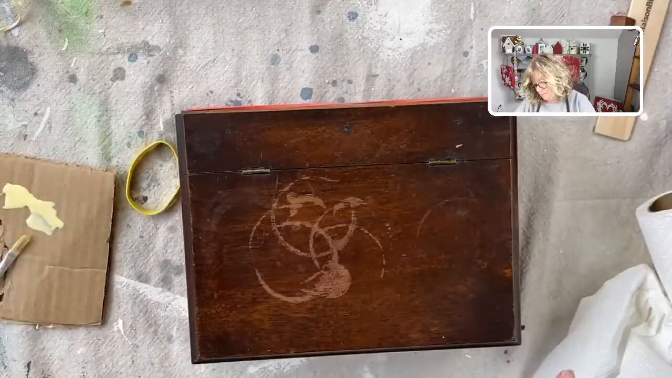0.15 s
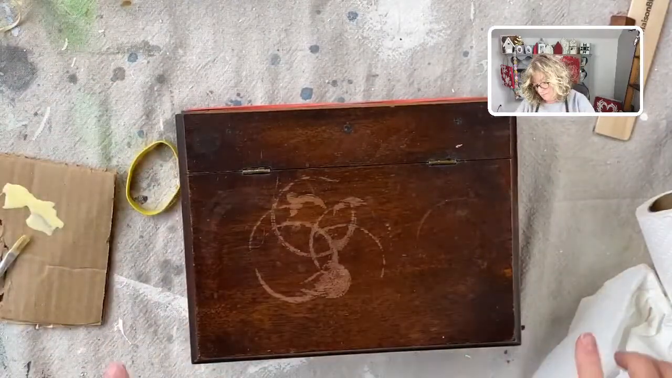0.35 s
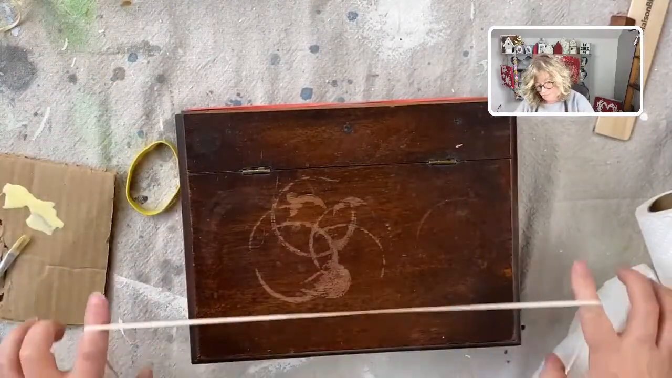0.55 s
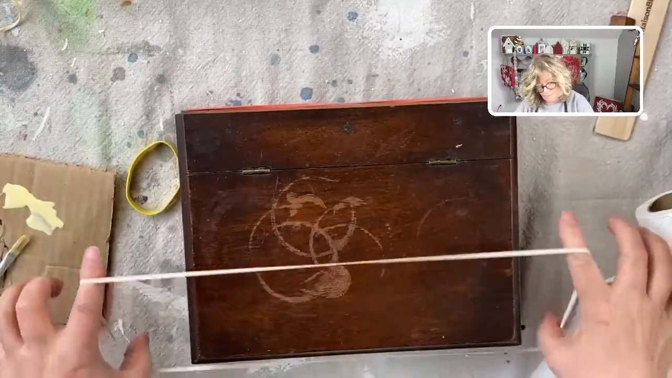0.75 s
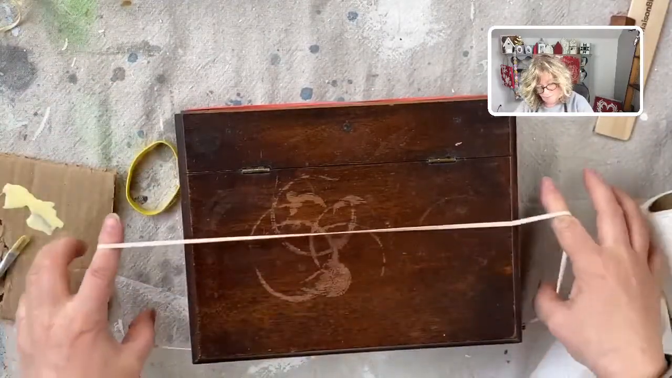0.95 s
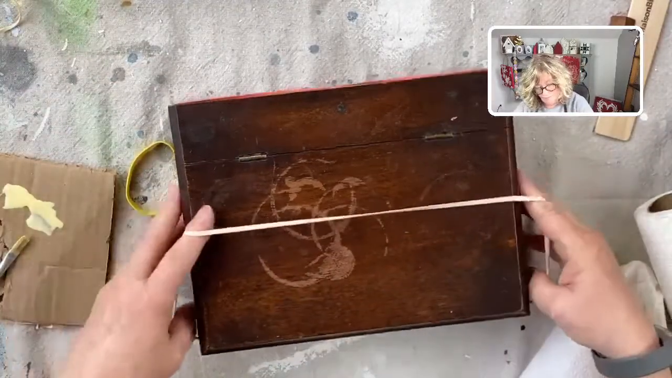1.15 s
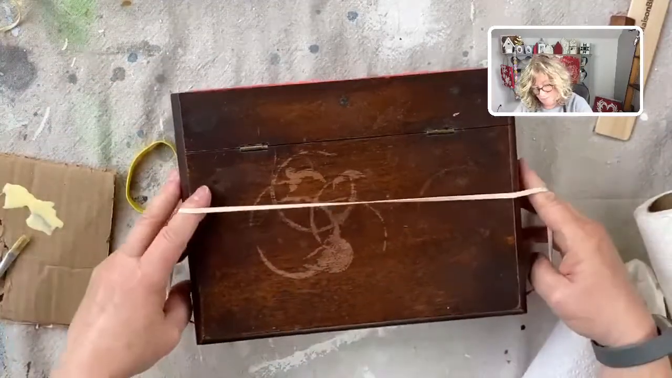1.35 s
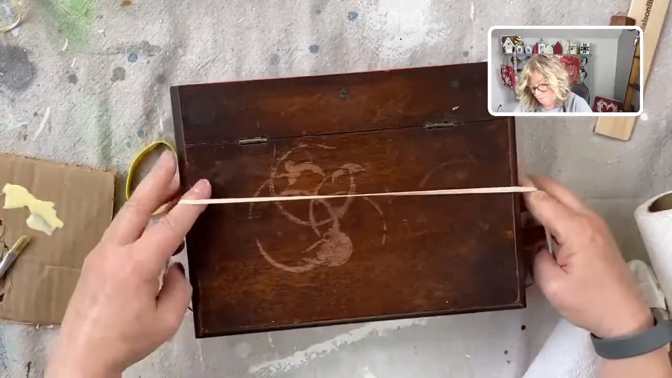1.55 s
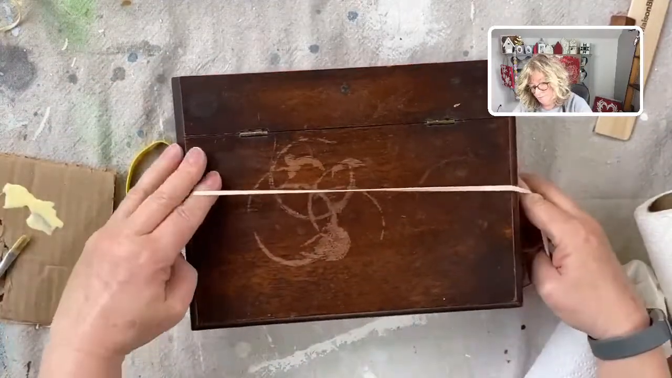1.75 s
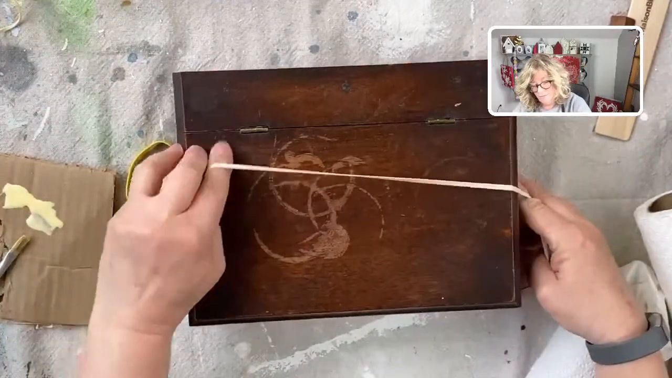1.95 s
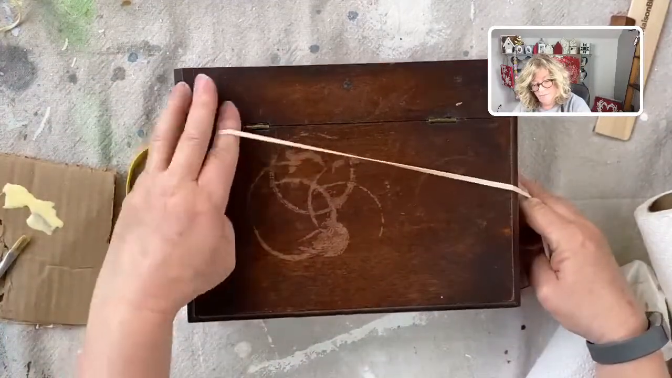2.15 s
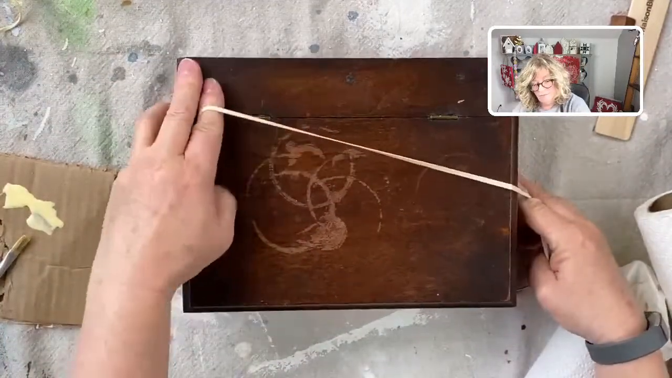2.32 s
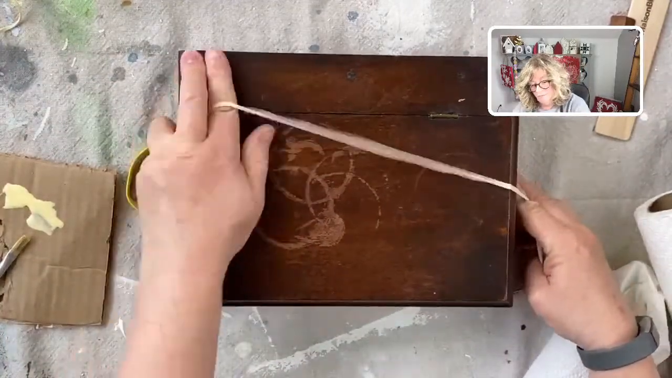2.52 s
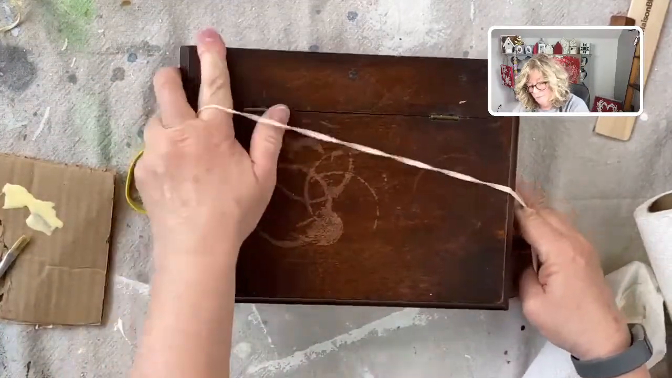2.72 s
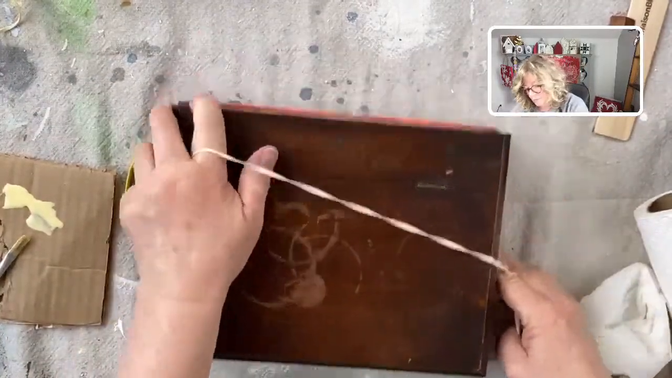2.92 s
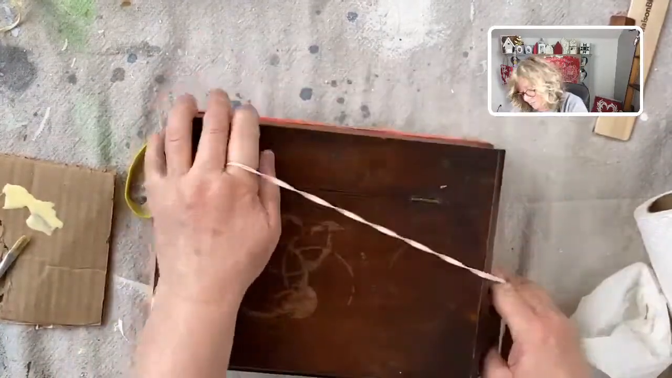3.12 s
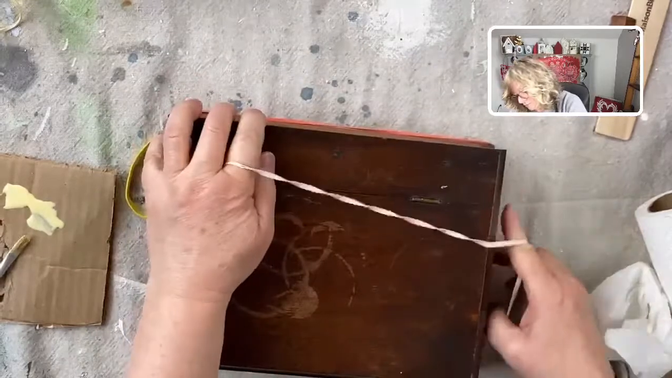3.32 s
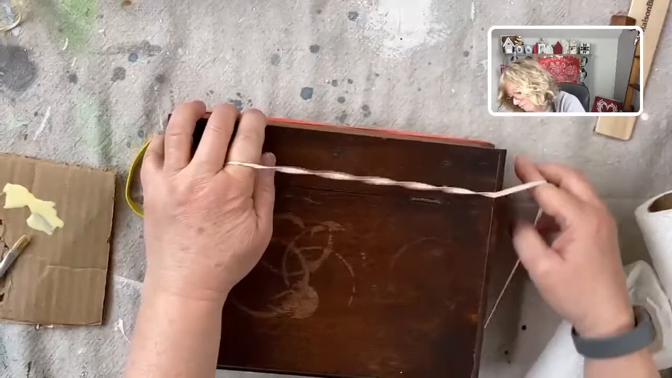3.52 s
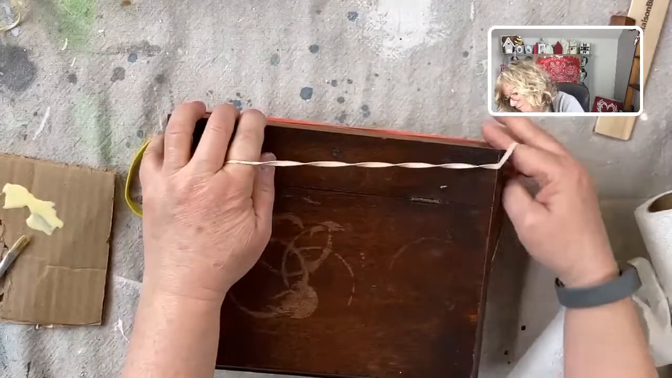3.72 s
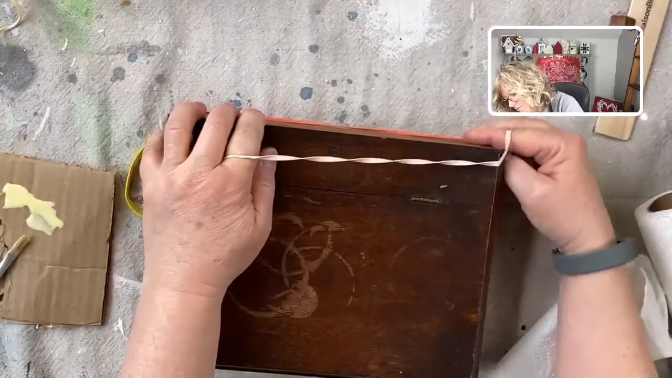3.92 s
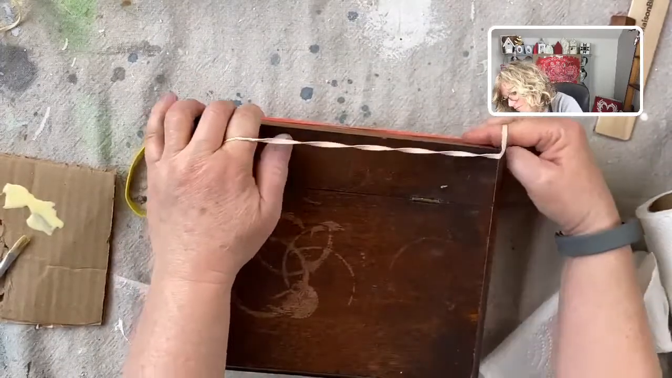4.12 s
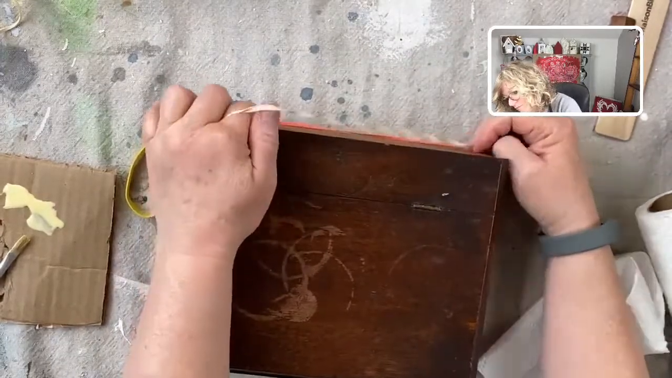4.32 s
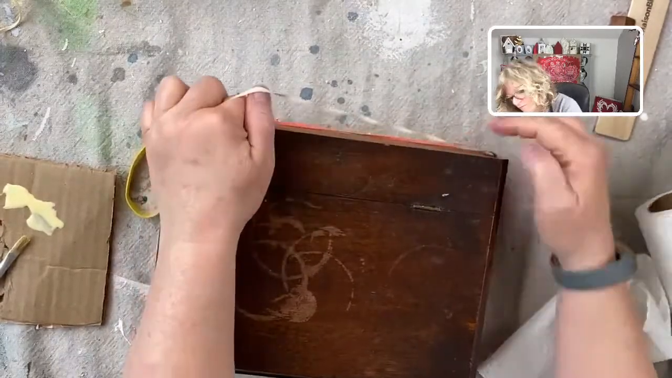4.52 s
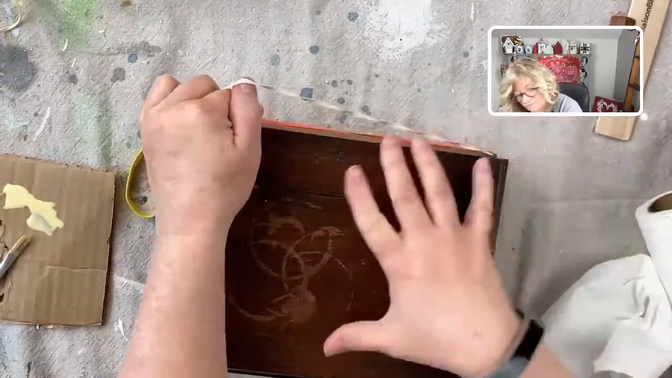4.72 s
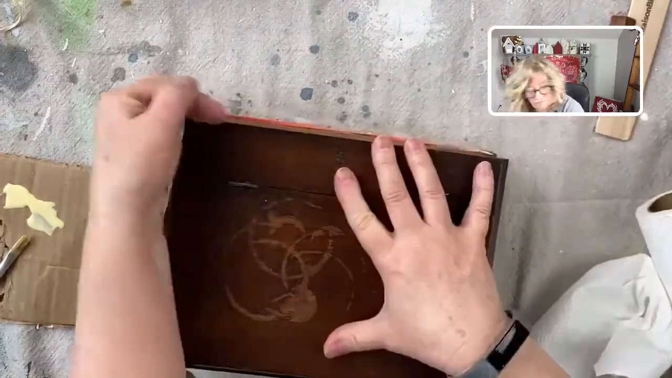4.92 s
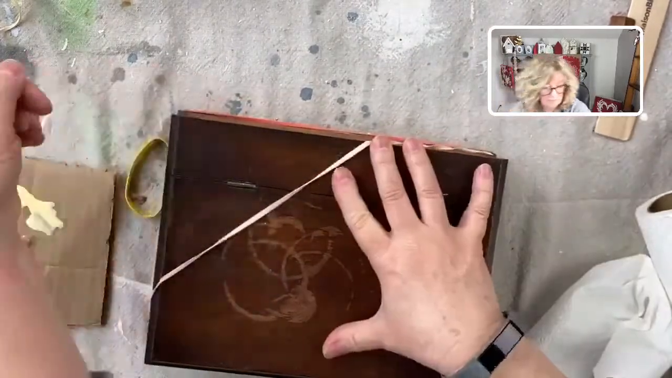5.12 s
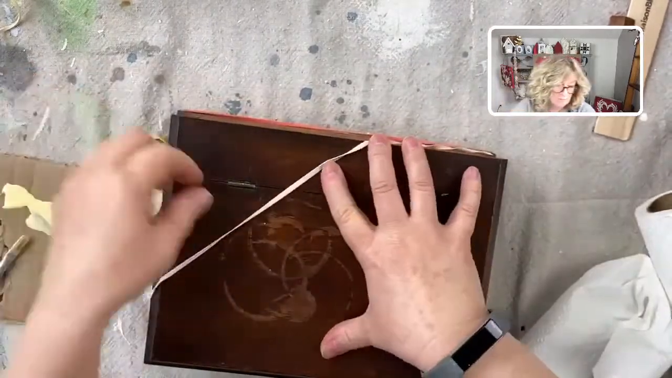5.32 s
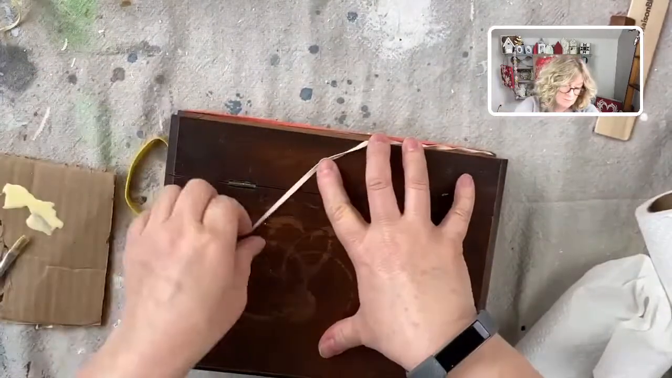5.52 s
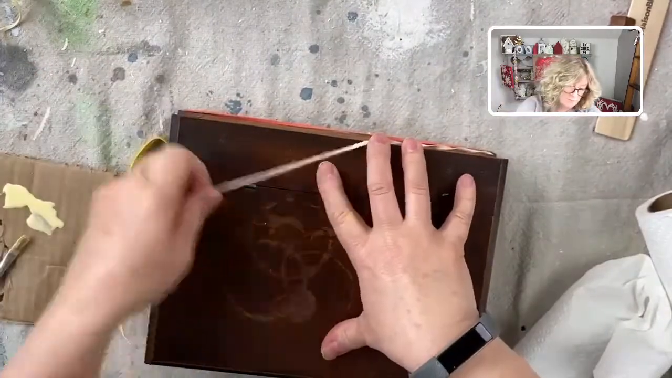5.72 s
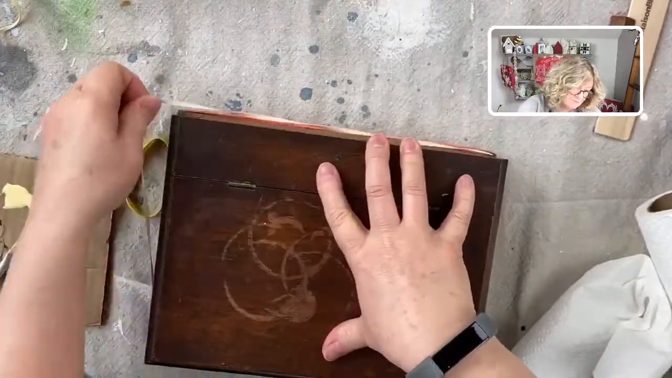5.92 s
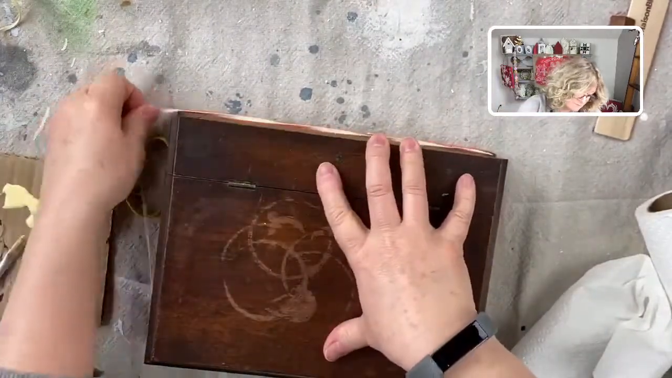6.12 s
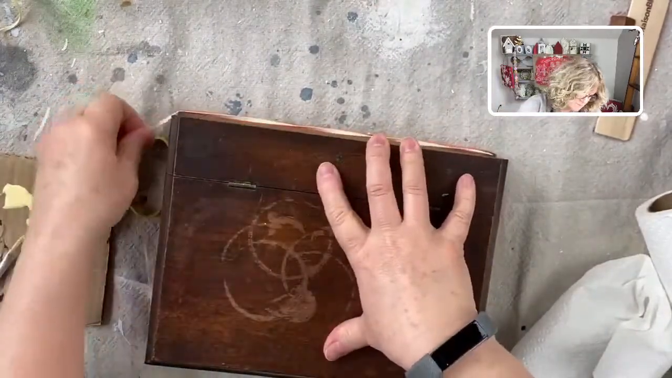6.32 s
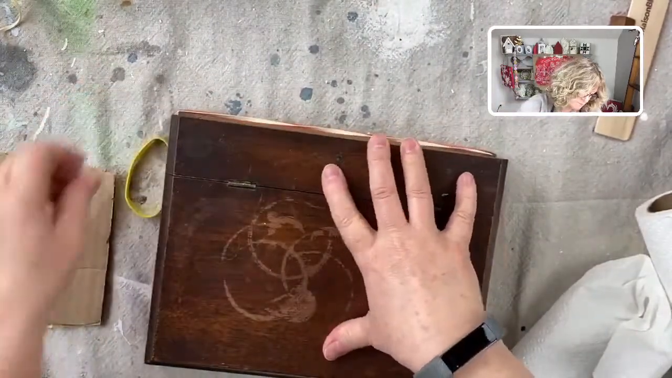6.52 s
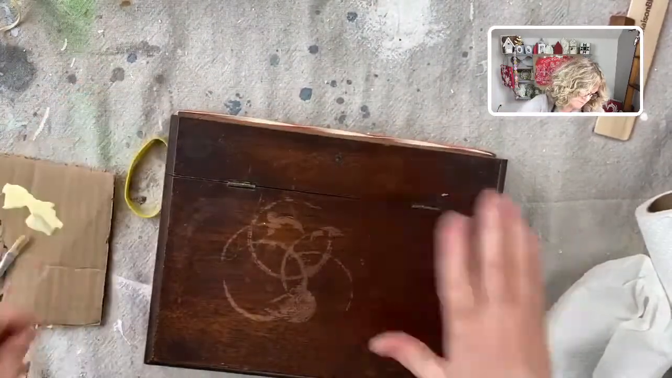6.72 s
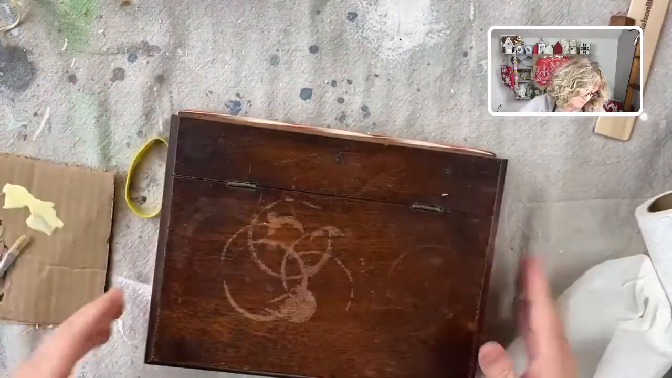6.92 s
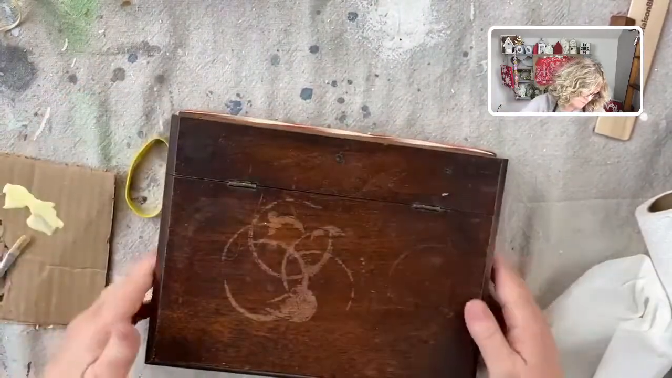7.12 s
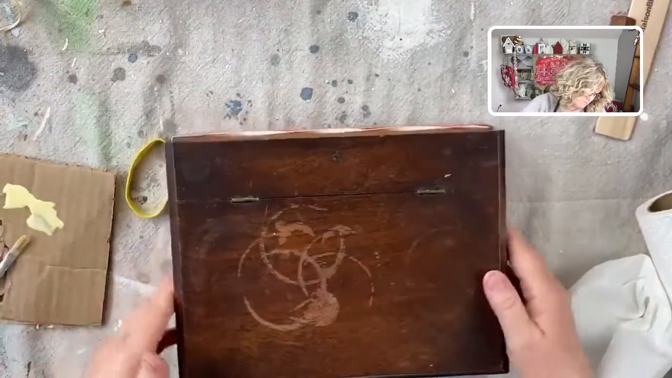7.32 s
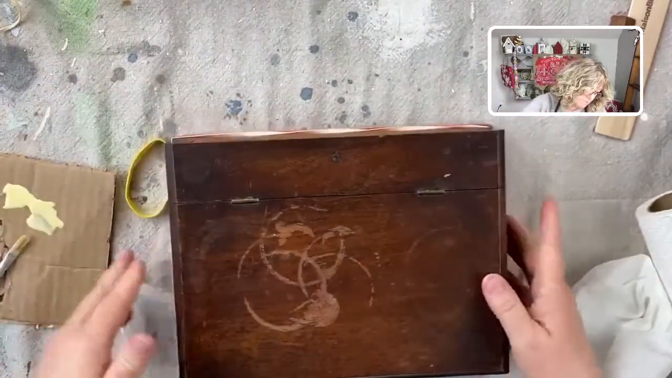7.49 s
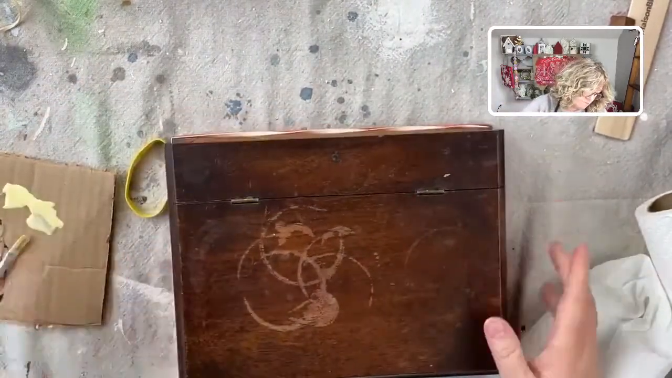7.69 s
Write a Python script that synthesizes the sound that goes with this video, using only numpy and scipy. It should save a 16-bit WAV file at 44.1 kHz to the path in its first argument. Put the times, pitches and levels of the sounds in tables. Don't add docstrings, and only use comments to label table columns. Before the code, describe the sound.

Close to the microphone in a small quiet room, a rubber band flicks with an early snap, then is worked around a hollow wooden box. The box scrapes and thumps softly on a cloth-covered table amid light rubber ticks and finger rubs. A fluttering snap follows past four seconds, a very loud crack at five, and another sharp snap near six and a half before quiet settling.

```python
import sys
import numpy as np
from scipy import signal
from scipy.fft import rfft, irfft, next_fast_len
from scipy.io import wavfile
from scipy.ndimage import uniform_filter1d, map_coordinates

SR = 44100
rng = np.random.default_rng(int(sys.argv[2]) if len(sys.argv) > 2 else 0)


def ratio(d):
    e = np.asarray(d, float) / 20
    return 10 ** e


def dump(signal):
    limited = np.clip(np.atleast_2d(signal).T, -1, 1)
    pcm = np.round(limited * 32767).astype(np.int16)
    wavfile.write(sys.argv[1], SR, pcm)


N = 341775

# frequency in Hz, level in dB.
LID_MODES = [(431, -6), (646, 1), (710, -2), (810, 0.5), (1075, -1), (1270, 0), (1450, -3), (1710, 1.5),
             (1950, -1.5), (2350, -1), (2520, -3.5), (2900, 1), (3320, -3), (3920, -3.5)]


def unit(x):
    return x / np.sqrt(np.mean(x ** 2) + 1e-20)


def along(points, hz):
    f, v = np.transpose(points)
    return np.interp(np.log(hz + 1), np.log(f + 1), v)


def curves(rows):
    s, *cols = np.transpose(rows)
    return [np.interp(np.arange(N) / SR, s, c) for c in cols]


def wobble(rate_hz):
    knots = rng.standard_normal(int(N * rate_hz / SR) + 4)
    return map_coordinates(knots, [np.arange(N) * rate_hz / SR])


def filtered(x, response):
    m = next_fast_len(N + SR // 2)
    return irfft(rfft(x, m) * response(np.fft.rfftfreq(m, 1 / SR)), m)[..., :N]


def highpass(f, corner_hz):
    return 1j * f / (corner_hz + 1j * f)


def resonance(f, centre_hz, width_hz, db):
    return ratio(db) * 1j * f * width_hz / (centre_hz ** 2 - f * f + 1j * f * width_hz)


def onset(t, rise_s):
    return 1 - np.exp(-t / rise_s)


def ring(t, hz, t60_s, rise_s):
    return np.sin(2 * np.pi * hz * t) * ratio(-60 * t / t60_s) * onset(t, rise_s)


def noise(spectrum, grit_db=0, patchy_db=0):
    grains = rng.standard_normal(N) * ratio(grit_db * rng.exponential(size=N))
    z = signal.stft(grains, nperseg=512)[2]
    field = uniform_filter1d(rng.standard_normal(z.shape), size=4, axis=0)
    field = uniform_filter1d(field, size=7, axis=1)
    patchy = signal.istft(z * ratio(patchy_db * unit(field)), nperseg=512)[1][:N]
    return unit(filtered(patchy, lambda hz: ratio(along(spectrum, hz))))


def causal(spectrum):
    size = 1024
    cep = irfft(np.log(ratio(along(spectrum, np.fft.rfftfreq(size, 1 / SR))) + 1e-4), size)
    cep[1:size // 2] *= 2
    cep[size // 2 + 1:] = 0
    pulse = irfft(np.exp(rfft(cep)), size)[:size // 2]
    return pulse / np.linalg.norm(pulse)


def band(contacts, rise_s, crack_db, slap_db, far_db):
    # frequency in Hz, level in dB per Hz.
    rubber_colour = [(880, -41.5), (1500, -15.5), (3410, -4.5), (4050, -7.5), (5530, -4.5), (7770, -7.5),
                     (9890, -3.5), (12300, -3), (13600, 0.5), (16000, -5.5), (16500, -31.5)]
    lid_reach = 0.45
    t = np.arange(SR // 8) / SR
    n = len(t)
    rubber, wood = np.zeros((2, N + SR)), np.zeros((2, N + SR))
    lid_hz, lid_db = np.transpose(LID_MODES)
    sines = np.sin(2 * np.pi * lid_hz[:, None] * t)
    for s, db, wood_db, hz, flutter_s, wood_s in contacts:
        at = round(s * SR)
        chance, modes = rng.standard_normal((3, n)), rng.standard_normal((2, len(lid_hz)))
        uneven = unit(uniform_filter1d(chance[2], size=40))
        shake = ratio(1.5 * uneven - 60 * t / flutter_s) * onset(t, rise_s)
        rubber[0, at:at + n] += ratio(db - 9) * shake * chance[0]
        rubber[0, at + 12] += ratio(db + crack_db)
        rubber[1, at] += ratio(db - 6.5) * np.linalg.norm(shake)

        nearness = np.exp(-(np.log(lid_hz / hz) / lid_reach) ** 2)
        woken = ratio(lid_db + 2 * modes[0]) * np.sign(modes[1]) * nearness
        lid = ring(t, hz, wood_s, rise_s)
        lid += ratio(-9) * woken @ sines * ratio(-60 * t / (1.6 * wood_s)) * onset(t, rise_s)
        bandpass = signal.butter(2, [hz / 2, hz * 2.13], "band", fs=SR)
        slap = ratio(slap_db) * shake * unit(signal.lfilter(*bandpass, chance[1]))
        wood[0, at:at + n] += ratio(db + wood_db) * (lid + slap)
        smooth = unit(ring(t, hz, 0.0019, 0.00012)) / np.sqrt(n)
        wood[1, at:at + n] += ratio(db + wood_db + far_db) * np.linalg.norm(lid + slap) * smooth
    bright = signal.fftconvolve(rubber, causal(rubber_colour)[None], axes=1)[:, :N]
    return bright + filtered(wood[:, :N], lambda f: highpass(f, 350) ** 2)


def snaps_taps_and_scuffs():
    # start in seconds, bright peak in dB, wood above it in dB, wood pitch in Hz.
    snap_rows = [(0.2628, -24.5, -1.5, 2730), (0.2644, -36.5, -14, 2440), (0.2708, -21.5, -9, 1980),
                 (0.2743, -19.5, -9.5, 610), (0.2914, -29, -6, 775), (4.364, -29, -1, 1450),
                 (4.3689, -32, -3, 1300), (4.372, -24.5, -10, 1400), (4.375, -22.5, -11, 1410),
                 (4.3795, -27, -10, 1700), (4.3835, -29, -9, 1500), (4.3868, -26, -11, 1400),
                 (4.3893, -26.5, -5.5, 646), (4.3947, -26, -19, 1470), (5.0404, -15, -16, 2100),
                 (5.043, -11.5, -18, 1400), (5.0467, -17, -14, 2900), (5.051, -19.5, -14, 1370),
                 (5.077, -5, -22, 1070), (5.081, -15, -17, 570), (5.085, -14, -9, 720),
                 (5.093, -21, -8, 1070), (5.909, -29, -19, 1960), (5.9268, -28.5, -22, 590),
                 (5.9331, -28.5, -21, 672), (5.9436, -37, -20, 687), (5.9556, -42, -27, 906),
                 (5.96, -31, -28, 910), (5.9636, -36, -31, 900), (6.4805, -10, -12.5, 1880),
                 (6.4846, -16, -8.5, 1080), (6.4895, -19, -8, 890)]
    # the same four, then wood t60 in seconds.
    tap_rows = [(0.1254, -47.5, 3.5, 1790, 0.0078), (2.0104, -39, -11, 815, .02),
                (4.6274, -56, -5, 1860, 0.024), (2.449, -43, -7, 810, .02), (2.4235, -50, -7, 1700, .02),
                (2.456, -27, -11.5, 1710, 0.02), (2.615, -30, -12, 2140, 0.038),
                (2.7307, -45, -21, 1320, 0.0088), (3.339, -57, -19, 1680, 0.02),
                (3.5864, -51.5, 6, 1720, 0.0087), (3.588, -71.5, 19.5, 755, 0.036),
                (3.632, -52, -19, 1048, .015), (4, -54, -2, 1920, 0.022), (4.205, -59, 4, 845, 0.01),
                (4.6154, -48, -3, 1886, 0.052), (4.9335, -61.5, 1, 1920, 0.019),
                (7.6113, -72, 12, 764, .02)]
    scuff_rows = [(1.0394, -62.5, 15, 800), (1.2087, -68, 17.5, 1050), (1.469, -76, 28.5, 700),
                  (1.602, -46.5, 0.5, 1270), (1.9848, -57, 7, 815), (2.0103, -39, -4, 790),
                  (2.0981, -63, 14, 1660), (6.468, -51.5, -6.5, 3000), (2.1898, -50, 2.5, 1220),
                  (2.348, -43, -0.5, 800), (2.378, -40.5, -29, 690), (2.4397, -49.5, 7, 806),
                  (2.465, -34.5, -15, 690), (2.5284, -44.5, 7, 485), (2.5453, -53, 13.5, 735),
                  (2.5844, -38.5, -1, 785), (2.6205, -43, -1.5, 3000), (2.761, -32, -6.5, 506),
                  (2.7675, -46.5, 8, 996), (4.889, -52.5, 3.5, 704), (3.985, -70.5, 21, 468),
                  (4.342, -78, 23, 800), (4.352, -53, -8, 2000), (5.031, -47, -6, 2000),
                  (0.253, -53, -3, 2700), (2.101, -54, -5, 1710), (5.838, -61, 6.5, 1880),
                  (5.8483, -50.5, 7.5, 1278), (5.8609, -63, 19, 826), (5.8797, -59, 6, 833),
                  (5.9898, -51, -5, 2500), (7.03, -64.5, 6, 2335), (7.4254, -55.5, -2.5, 1270)]
    snap_flutter_s, snap_wood_s, tap_flutter_s = 0.018, 0.014, 0.023
    scuff_flutter_s, scuff_wood_s = 0.063, 0.06
    hits = [(*r, snap_flutter_s, snap_wood_s) for r in snap_rows]
    hits += [(*r, tap_flutter_s, wood_s) for *r, wood_s in tap_rows]
    drags = [(*r, scuff_flutter_s, scuff_wood_s) for r in scuff_rows]
    sharp = band(hits, rise_s=0.00046, crack_db=-3.0, slap_db=-6.5, far_db=-1.5)
    soft = band(drags, rise_s=0.0031, crack_db=-23, slap_db=-4.5, far_db=-8.5)
    return sharp + soft


def squeaks():
    # start in seconds, pitch in
    # Hz, peak in dB, t60 in seconds.
    struck_rows = [(0.127, 2970, -61.5, 0.2), (0.129, 3250, -59, .08), (.268, 692, -43, 0.36),
                   (.27, 1135, -47.5, 0.4), (.266, 2284, -45, .25), (0.267, 2870, -42, 0.11),
                   (.27, 1956, -43, 0.19), (1.965, 3010, -66, .2), (2.045, 3960, -61, .2),
                   (2.091, 1740, -56, .15), (2.09, 1340, -56, 0.17), (2.15, 1340, -52, .08),
                   (2.35, 1760, -50, .06), (2.352, 3000, -50, .08), (2.379, 4500, -53, 0.09),
                   (2.585, 3920, -54, .08), (2.765, 3320, -48, .08), (4.368, 647, -44.5, 0.29),
                   (4.37, 1950, -49, 0.21), (4.37, 1680, -51, 0.37), (6.481, 1080, -37, 0.19),
                   (6.482, 715, -34.5, 0.14), (6.482, 2455, -35, 0.084), (5.085, 1070, -35, 0.18),
                   (3.691, 496, -58, 0.12), (1.599, 1230, -60, .3), (1.6, 3620, -55, 0.06),
                   (2.145, 2810, -61, 0.56), (2.35, 858, -58, 0.046), (2.767, 3950, -51, 0.18),
                   (5.85, 833, -43, 0.092), (5.849, 3560, -47.5, 0.043), (6.4812, 13400, -13, .012),
                   (4.03, 1723, -63, 0.62), (4.375, 1453, -49.5, 0.42), (4.4, 152.5, -49, 0.62),
                   (4.618, 1856, -55, 0.16), (5.042, 5500, -24.5, 0.034), (5.0776, 690, -9, 0.018),
                   (5.082, 2940, -22, 0.037),
                   (4.3748, 13000, -19, .006), (5.0772, 13700, -11, .012), (5.0445, 11000, -22, .012),
                 (5.047, 2910, -28, .05), (5.048, 1370, -30, .06), (4.0, 3400, -44, .015),
                 (4.0, 1750, -37, .016), (4.004, 1670, -52, .12), (1.469, 950, -52, .04),
                 (1.469, 550, -48, .04), (5.85, 646, -48, .08), (6.4902, 1950, -28, .02),
                 (6.481, 8300, -30, .04), (3.9, 3400, -50, 0.023), (3.588, 1670, -55, .1),
                 (5.909, 1920, -47, .02), (2.457, 1900, -46, .04), (2.457, 3450, -47, 0.033),
                 (4.389, 12500, -29, .01), (4.355, 6500, -53, .05), (4.366, 1450, -36, 0.094)]
    # start in seconds, length in seconds, pitch in Hz, level in dB.
    held_rows = [(2.187, 0.093, 2350, -58.5), (4.425, 0.091, 371, -52), (2.618, .012, 2950, -54),
                 (2.66, .045, 2900, -62), (5.9, 0.032, 646, -53.5), (5.925, 0.037, 431, -52),
                 (5.99, .012, 2560, -58), (5.99, .012, 3500, -59), (4.49, 0.033, 1400, -57),
                 (4.49, 0.036, 1800, -60), (2.53, .025, 1900, -57), (4.63, .05, 330, -59)]
    # start in seconds, length in seconds, pitch in Hz, level in dB.
    chafe_rows = [(7.032, .06, 2750, -67), (7.032, .05, 2480, -68), (7.1, .085, 1650, -66),
                  (7.11, .07, 1150, -66), (7.12, .06, 1380, -66), (7.11, .05, 1950, -68),
                  (2.185, .04, 1270, -56), (2.19, .03, 2050, -59), (2.535, .03, 780, -51),
                  (2.43, .03, 1700, -56), (2.0, .05, 2900, -61)]
    let_go_s = 0.11
    out, t = np.zeros(N + SR), np.arange(SR // 3) / SR
    rows = [(s, 0, hz, db, t60_s, 0.1) for s, hz, db, t60_s in struck_rows]
    rows += [(*r, let_go_s, 0.13) for r in held_rows]
    rows += [(*r, let_go_s, 0.3) for r in chafe_rows]
    for s, hold_s, hz, db, t60_s, waver in rows:
        stick = unit(uniform_filter1d(rng.standard_normal((2, len(t))), size=200, axis=1))
        stick = stick * onset(t, 0.012)
        shape = ratio(-60 * np.maximum(t - hold_s, 0) / t60_s) * onset(t, min(0.003, t60_s / 30))
        tone = np.sin(2 * np.pi * (hz * t + waver * stick[1]))
        out[round(s * SR):][:len(t)] += ratio(db + 3.5 * stick[0]) * shape * tone
    return out[:N]


def twangs():
    # start in seconds, length in seconds, pitch in Hz, peak in dB.
    twang_rows = [
        (5.849, 0.1, 213, -53.5),
    ]
    tilt_db, fade_db = -1.5, -9.5
    out, t = np.zeros(N + SR), np.arange(SR // 4) / SR
    k = np.arange(2, 10)[:, None]
    for s, length_s, hz, db in twang_rows:
        come = map_coordinates(rng.standard_normal((10, 14)), [k + 0 * t, 45 * t + 0 * k])
        overtones = np.sin(2 * np.pi * (k * hz * t + rng.random(k.shape)))
        stack = (ratio(tilt_db * k + 2.7 * come) * overtones).sum(axis=0)
        level_db = db + fade_db * t / length_s - 450 * np.maximum(t - length_s, 0)
        out[round(s * SR):][:len(t)] += ratio(level_db) * onset(t, 0.0037) * stack
    return out[:N]


def box():
    # start in seconds, peak in dB, box pitch in Hz, table above it in dB.
    thump_rows = [(1.039, -31.5, 185, -12.5), (1.26, -28, 257, -20.5), (1.468, -40.5, 287, -21.5),
                  (1.604, -40.5, 230, -10), (1.683, -47, 312, -21), (1.709, -43, 234, -8.5),
                  (2.011, -38.5, 198, -11), (2.073, -40, 256, -18), (2.38, -36.5, 250, -2),
                  (2.616, -41, 291, -8.5), (2.772, -25.5, 234, -6), (2.883, -39.5, 231, -24),
                  (3.213, -38.5, 292, -20), (3.265, -45, 228, -34), (3.587, -34, 196, -53),
                  (4.371, -30.5, 263, -10.5), (4.888, -29.5, 215, -10.5), (5.08, -23, 263, -25.5),
                  (5.589, -48, 262, -25), (5.853, -40, 151, -24), (5.875, -45, 235, -28),
                  (5.936, -46, 214.8, -25), (6.481, -34.5, 257.5, -23), (6.684, -56.5, 260, -15),
                  (7.186, -53, 200, -1.5), (7.346, -51, 235, -9.5), (7.611, -35, 256, -17)]
    # frequency in Hz, level in dB, t60 in seconds.
    table_modes = [(94, -3, 0.21), (122.7, 7.5, 0.071)]
    push_db, push_s = 8.5, 0.017
    press_s = 0.003
    boom_s, boom_longer, boom_seated = 0.031, 0.11, 0.091
    out, t = np.zeros(N + SR), np.arange(SR // 4) / SR
    for s, db, hz, table_db in thump_rows:
        u = rng.standard_normal(4)
        t60_s = boom_s * ratio(-boom_longer * (db + 36.5) + boom_seated * (table_db + 10))
        boom = ring(t, hz, t60_s, 0.004)
        boom += ratio(push_db) * ring(t, hz, push_s, 0.004)
        boom += ratio(-7 + 1.5 * u[0]) * ring(t, 1.35 * hz, 0.8 * t60_s, 0.006)
        boom += ratio(-18.5 + u[1]) * ring(t, 500, 0.026, 0.0024)
        top = 0
        for (mode_hz, mode_db, mode_s), v in zip(table_modes, u[2:]):
            top = top + ratio(mode_db + 1.5 * v) * ring(t, mode_hz, mode_s, 0.006)
        knock = ratio(db + 6.5) * boom + ratio(db + table_db + 8.0) * top
        out[round(s * SR):][:len(t)] += knock * onset(t, press_s)
    return filtered(out[:N], lambda f: highpass(f, 55) ** 2)


def moves(rows, rise_db_s, fall_db_s):
    t = np.arange(0, N, 64) / SR
    s, length_s, start_db, end_db = np.transpose(rows)[..., None]
    hold_db = start_db + (end_db - start_db) * np.clip((t - s) / length_s, 0, 1)
    before_s, after_s = np.maximum(s - t, 0), np.maximum(t - s - length_s, 0)
    return t, ratio(hold_db - rise_db_s * before_s - fall_db_s * after_s) ** 2 + 1e-13


def effort():
    # start in seconds, length in seconds, rumble at the start in dB, change to the end in dB.
    slide_rows = [(1.037, 0.2, -59, 3), (1.272, 0.14, -65.5, 0.5), (1.598, 0.17, -56, -7.5),
                  (1.782, 0.23, -69, -8), (1.981, 0.25, -59, -4), (2.397, 0.1, -56, -10),
                  (2.557, 0.11, -53.5, -15), (2.741, 0.074, -59, 10), (2.868, 0.12, -56, 11.5),
                  (2.993, 0.12, -49.5, -1.5), (3.583, 0.23, -60, -13.5), (3.946, 0.2, -69.5, 3),
                  (4.299, 0.075, -68.5, 18.5), (4.413, 0.22, -67, 4), (4.896, 0.073, -51.5, -11.5),
                  (5.053, 0.13, -50, -6.5), (5.602, .17, -65.5, -5), (5.879, 0.2, -52, -16.5),
                  (6.495, 0.18, -61.5, -5.5), (7.193, 0.067, -61.5, -7), (7.292, 0.14, -71.5, 12.5),
                  (7.625, 0.06, -61, -14.5)]
    # start in seconds, length in seconds, rub at the end in dB, rub colour in Hz, cloth above it in dB.
    stroke_rows = [(0.615, 0.019, -70.5, 1400, -8), (0.727, 0.14, -66, 1400, -1.5),
                   (1, 0.13, -65, 1015, -8.5), (1.134, 0.13, -61, 1204, -7), (1.585, 0.13, -61, 1255, -9.5),
                   (1.986, 0.12, -57, 1323, -8.5), (2.135, 0.023, -56.5, 1300, -19),
                   (2.169, 0.027, -52, 1700, -7.5), (2.347, 0.11, -58, 1054, -4),
                   (2.506, 0.16, -55.5, 800, -10), (2.667, 0.11, -64.5, 1430, 3),
                   (2.792, 0.31, -55, 1294, -3.5), (3.171, 0.066, -65, 940, -3),
                   (4.92, 0.12, -65.5, 1820, -2), (5.858, 0.12, -58, 1502, -7),
                   (7.037, 0.048, -65, 2290, -12.5), (7.101, 0.064, -62, 1697, -10.5),
                   (7.294, 0.14, -63.5, 1400, 0)]
    # as for the strokes, but the rub at the
    # start in dB.
    rustle_rows = [(.3, 0.14, -59, 1060, -11), (1.3, 0.19, -71, 1200, -8), (1.48, 0.27, -69, 830, -9),
                   (1.76, 0.18, -71.5, 1025, -4.5), (2.24, 0.089, -64.5, 2110, -29),
                   (3.33, 0.49, -71.5, 1345, -4), (3.6, 0.64, -70, 1400, -8.5), (4.02, 1, -73, 1780, -1.5),
                   (4.45, 0.32, -74.5, 1450, -19), (5.15, 0.34, -68, 1200, -3.5),
                   (5.58, .22, -72.5, 903, -2), (6.01, 0.068, -71, 1780, -23.5),
                   (6.55, 0.18, -66, 1226, -5), (7.19, 0.072, -65.5, 1590, -8.5)]
    stroke_swell_db, cloth_swell_db = 7, 10
    settle_db = -7.5
    t, slide = moves([(s, n, db, db + d) for s, n, db, d in slide_rows], rise_db_s=497, fall_db_s=297.5)
    rub_rows = [(s, n, db - stroke_swell_db, db) for s, n, db, hz, up in stroke_rows]
    rub_rows += [(s, n, db, db + settle_db) for s, n, db, hz, up in rustle_rows]
    cloth_rows = [(s, n, db + up - cloth_swell_db, db + up) for s, n, db, hz, up in stroke_rows]
    cloth_rows += [(s, n, db + up, db + up + settle_db) for s, n, db, hz, up in rustle_rows]
    rub = moves(rub_rows, rise_db_s=599.5, fall_db_s=251)[1]
    cloth = moves(cloth_rows, rise_db_s=599.5, fall_db_s=251)[1]
    log_hz = np.log([row[3] for row in stroke_rows + rustle_rows])
    rub_hz = np.exp(log_hz @ rub / rub.sum(axis=0))
    gains = np.sqrt([slide.sum(axis=0), rub.sum(axis=0), cloth.sum(axis=0)])
    return curves(np.transpose([t, *gains, rub_hz]))


def specks(rub_hz, count=3000):
    where, pitch = rng.random(count), rng.standard_normal(count)
    size = np.minimum(rng.exponential(size=count), 3)[:, None]
    at = (where * (N - 1)).astype(int)
    lid_hz = np.transpose(LID_MODES)[0]
    wanted_hz = rub_hz[at] * np.exp(0.45 * pitch)
    nearest = np.abs(np.log(wanted_hz)[:, None] - np.log(lid_hz)).argmin(axis=1)
    hz = lid_hz[nearest][:, None]
    k = np.arange(1300)
    grains = ratio(2.2 * size - 60 * k / SR * hz / 70) * np.sin(2 * np.pi * hz * k / SR)
    return unit(np.bincount((at[:, None] + k).ravel(), grains.ravel(), N + len(k))[:N])


def hands():
    # frequency in Hz, width in Hz, level in dB.
    hollow_modes = [(85, 100, -7), (129, 42, -1.5), (224, 32, 5.5), (342, 160, -1.5)]
    # frequency in Hz, level in dB per Hz.
    rub_colour = [(300, -23), (480, 1), (982, -4), (1300, -2.5), (2360, -7), (6000, -12.5), (7800, -45),
                  (13200, -120)]
    # frequency in Hz, level in dB per Hz.
    cloth_colour = [(2060, -21), (3500, -2.5), (8000, -6.5), (10400, -7.5), (13000, -5.5), (14800, -7.5),
                    (16200, -19.5), (16500, -47)]
    # frequency in Hz, width in Hz, level in dB.
    skin_colours = [(800, 1200, -1), (1400, 1700, -5.5), (2700, 2300, 0)]
    lid_width_hz = 14
    drag_gain, rub_gain, cloth_gain, rub_hz = effort()
    lumps = wobble(30)

    def hollow_body(f):
        modes = sum((-1) ** k * resonance(f, *mode) for k, mode in enumerate(hollow_modes))
        return modes / (1 + (f / 450) ** 4)

    def lid_body(f):
        return sum((-1) ** k * resonance(f, hz, lid_width_hz, db) for k, (hz, db) in enumerate(LID_MODES))

    drag = unit(filtered(rng.standard_normal(N) * ratio(2.5 * wobble(50)), hollow_body))
    pressure = uniform_filter1d(np.abs(drag), size=700) + 0.3
    drag = unit(drag / pressure ** 0.82)

    plain = noise(rub_colour, grit_db=1.3, patchy_db=3)
    colour = np.zeros(N)
    for hz, width_hz, db in skin_colours:
        nearness = np.exp(-(np.log(rub_hz / hz) / 0.94) ** 2)
        colour += nearness * ratio(db) * unit(filtered(plain, lambda f: resonance(f, hz, width_hz, 0)))
    sung = unit(filtered(colour, lid_body))
    rub = ratio(1.2 * lumps + 2 * wobble(140)) * (0.4 * plain + 0.55 * colour + 0.6 * sung)
    rub = unit(rub + 0.5 * specks(rub_hz))

    hiss = noise(cloth_colour, grit_db=0.5, patchy_db=2.5)
    cloth = unit(ratio(1.8 * lumps + 1.2 * wobble(120)) * hiss)
    return drag_gain * drag + rub_gain * rub + cloth_gain * cloth


def room(x):
    # frequency in Hz, t60 in seconds.
    decay_s = [(100, 0.18), (500, 0.37), (1400, 0.43), (3700, 0.41), (9700, 0.3), (16000, 0.2)]
    # frequency in Hz, level in dB.
    wall_colour = [(200, 0.5), (800, 1), (2500, -2.5), (6000, -5.5), (14000, -6.5)]
    step, out = SR // 3, np.zeros(N + 2 * SR)
    for start in range(0, N, step):
        hz, t, z = signal.stft(rng.standard_normal(SR // 2), SR, nperseg=256)
        tail_db = along(wall_colour, hz)[:, None] - 60 * t / along(decay_s, hz)[:, None]
        tail = signal.istft(z * ratio(tail_db), SR, nperseg=256)[1]
        tail = tail * onset(np.arange(len(tail)) / SR, 0.00051)
        wet = signal.fftconvolve(x[start:start + step], tail / np.linalg.norm(tail))
        out[start:start + len(wet)] += wet
    return out[:N]


def air():
    # frequency in Hz, level in dB per Hz.
    air_colour = [(15, -49.5), (25, -15.5), (65, 3.5), (108, 0), (304, -6), (410, -13.5), (2270, -21),
                  (7510, -28), (8830, -24), (10100, -29), (14000, -27), (15200, -27), (16500, -45.5)]
    return ratio(-70 + 0.38 * wobble(3.4)) * noise(air_colour)


def scene():
    near, far = snaps_taps_and_scuffs()
    knocks = box()
    wet = room(ratio(-5.0) * far + ratio(-9.0) * knocks)
    return (near + squeaks() + twangs() + knocks + hands() + wet + air())[None]


def low_pass(x):
    return signal.sosfilt(signal.butter(12, 16810, fs=SR, output="sos"), x)


def record(dry):
    thin = filtered(dry, lambda f: highpass(f, 30) ** 3 / (1 + (f / 16400) ** 80))
    return low_pass(thin)


dry = scene()
out = record(dry)
dump(out)
```